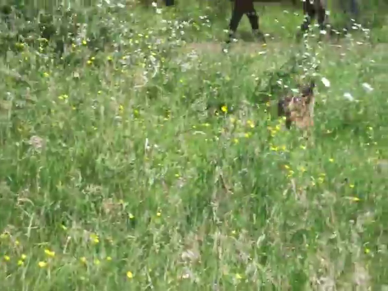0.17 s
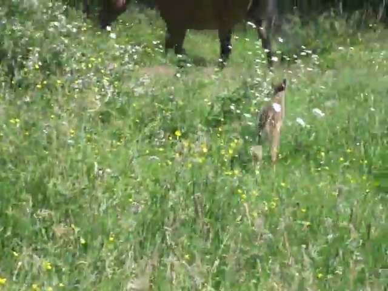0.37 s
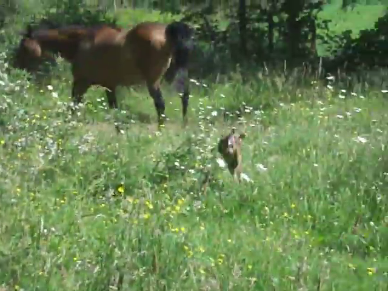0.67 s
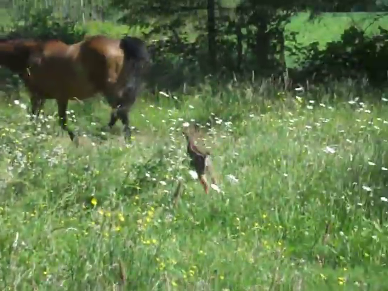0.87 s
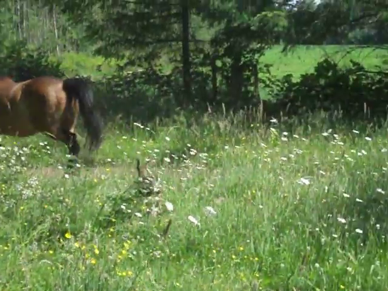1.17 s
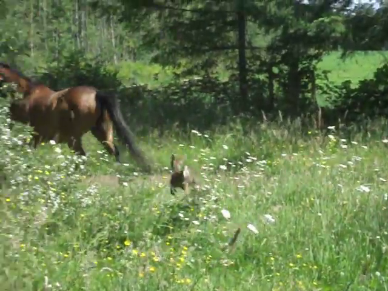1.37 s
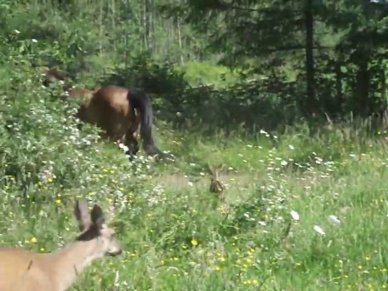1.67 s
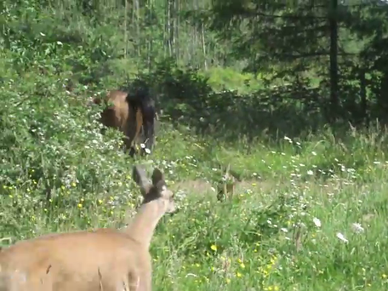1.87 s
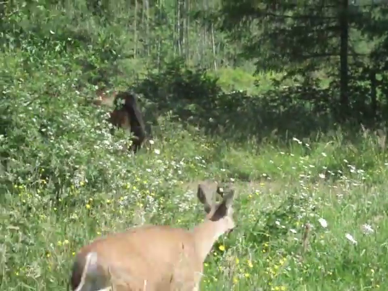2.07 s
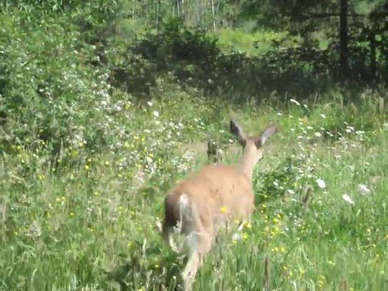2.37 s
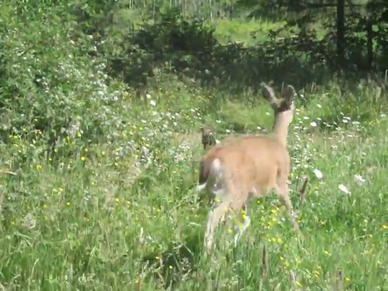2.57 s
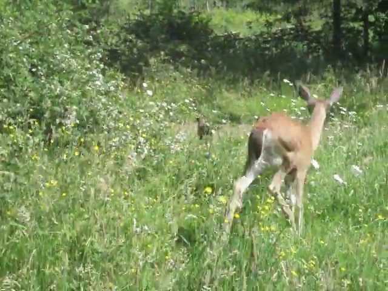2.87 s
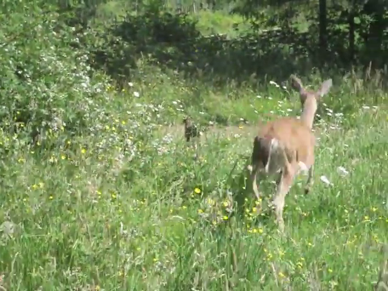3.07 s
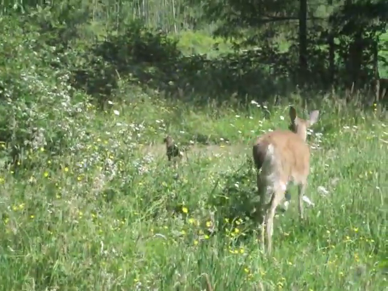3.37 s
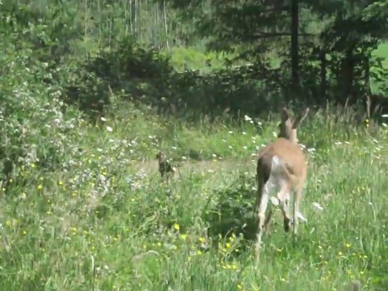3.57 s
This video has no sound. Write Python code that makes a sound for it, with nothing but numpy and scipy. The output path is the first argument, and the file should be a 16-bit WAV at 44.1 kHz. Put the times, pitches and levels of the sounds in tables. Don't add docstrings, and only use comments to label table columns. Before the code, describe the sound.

Loud, clipped plastic clicks from a camera control burst at about 0.44 and 0.52 seconds, very close and dry. A narrow, nasal leaf hiss runs throughout a summer meadow while low wind gusts thump the microphone, strongest near 0.3, 2.3 and 3.0. Grass ticks and swishes around 1.7 and 2.4-2.9. A distant bird chirps at 2.0 and 3.3, with faint low notes near 2.7; a twig cracks at 3.36.

```python
import sys
import numpy as np
from scipy import signal
from scipy.fft import rfft, irfft, next_fast_len
from scipy.io import wavfile
from scipy.ndimage import uniform_filter1d

SR = 44100
rng = np.random.default_rng(int(sys.argv[2]) if len(sys.argv) > 2 else 0)


def waveform_to_disk(signal):
    frames = np.transpose(np.atleast_2d(signal))
    scaled = np.clip(frames, -1, 1) * 32767
    samples = np.round(scaled).astype(np.int16)
    wavfile.write(sys.argv[1], SR, samples)


def convert_level_to_amplitude(level_db):
    exponent = np.asarray(level_db, float) / 20
    return 10 ** exponent


N = 163611
T = np.arange(N) / SR


def rms_one(x):
    return x / np.sqrt(np.mean(x ** 2) + 1e-20)


def band(x, low_hz, high_hz):
    return signal.sosfilt(signal.butter(2, [low_hz, high_hz], "band", fs=SR, output="sos"), x)


def drift(rate):
    pole = np.exp(-80 * np.pi * rate / SR)
    noise = rng.standard_normal(N // 40 + 2002)
    slow = signal.lfilter([1], [1, -2 * pole, pole * pole], noise)[2000:]
    return np.interp(np.arange(N) / 40, np.arange(len(slow)), rms_one(slow))


def ring(clicks, hz, t60):
    radius, angle = convert_level_to_amplitude(-60 / (t60 * SR)), 2 * np.pi * hz / SR
    return signal.lfilter([0, np.sin(angle)], [1, -2 * radius * np.cos(angle), radius * radius], clicks + 1e-18)


def port(x):
    # resonance in Hz, width in Hz, gain in dB.
    resonances = [(1350, 270, -12.5), (1850, 980, -18.5), (2400, 420, -10), (2817, 128, 4),
                  (3076, 250, -4.5), (3700, 1300, -26), (4800, 1000, -26.5)]
    direct_db, direct_corner_hz = -14.5, 699
    size = next_fast_len(N + 8192)
    hz = np.arange(size // 2 + 1) * SR / size + 1
    power = convert_level_to_amplitude(2 * direct_db) / (1 + (hz / direct_corner_hz) ** 4) / (1 + (100 / hz) ** 2)
    for top_hz, width_hz, db in resonances:
        power = power + convert_level_to_amplitude(2 * db) / (1 + ((hz - top_hz) / width_hz) ** 2) ** 2
    cepstrum = irfft(np.log(power + 1e-12) / 2, size)
    cepstrum[1:size // 2] *= 2
    cepstrum[size // 2 + 1:] = 0
    return irfft(rfft(x, size) * np.exp(rfft(cepstrum)), size)[:N]


def foliage():
    # time in seconds, level in dB.
    breeze = [(0.1, -34), (0.13, -33), (0.24, -33), (0.27, -33.5), (0.88, -33.5), (1.37, -34), (1.82, -33),
              (3.19, -34), (3.47, -32.5), (3.71, -33.5)]
    # centre in seconds, level over the hiss in dB, half width in seconds.
    swishes = [
        (1.705, 0.5, 0.0072),
        (2.46, 3, 0.023),
        (2.577, 4, 0.038),
        (2.659, 2, .03),
        (2.787, 2.5, 0.0078),
        (2.9, 2.5, 0.011),
        (3.364, 10, .003),
        (3.371, 4, .003),
        (3.52, -0.5, .02),
    ]
    hiss_db, patchy_db, rustles_per_s, rustle_db = 0.5, 1.1, 470, -10.5
    struck = rng.random(N) < rustles_per_s * convert_level_to_amplitude(3 * drift(25)) / SR
    strength = convert_level_to_amplitude(1.2 * np.minimum(rng.exponential(1, N), 4))
    grains = struck * strength * rng.choice([-1, 1], N)
    air = rng.standard_normal(N) + convert_level_to_amplitude(rustle_db) * rms_one(grains)
    swell_db = sum(db * np.exp(-((T - s) / width) ** 2) for s, db, width in swishes)
    flicker_db = patchy_db * drift(12)
    breeze_db = np.interp(T, *np.transpose(breeze))
    return port(air * convert_level_to_amplitude(swell_db + flicker_db + breeze_db)) * convert_level_to_amplitude(hiss_db) / np.std(port(air))


def bird():
    chirp_tops = [
        2.039,
        3.29,
        3.319,
        2.672,
        2.735,
    ]
    chirp_levels = [-17, -28, -16.5, -24, -28.5]
    # top pitch in Hz, rise in seconds, fall in seconds, foot pitch as a share of the top.
    chirp_shapes = [(2930, .051, .023, .42), (2880, .03, .012, .6), (2940, .055, .021, .42),
                    (1720, .025, .03, .75), (1780, .025, .015, .8)]
    rise_bend, fall_bend = 2.2, 2.8
    foot_lift_db, fall_lift_db, after_top_db, flutter_db = -2, 4, -4, 2.0
    dip_lead_s, dip_s = .006, .004
    near_echo_s, near_echo_db = .012, -7
    tree_echo_db, tree_t60_s = -6, .3
    song = np.zeros(N)
    for s, db, (top_hz, rise, fall, foot) in zip(chirp_tops, chirp_levels, chirp_shapes):
        rising = T < s
        inside = np.clip(np.where(rising, (s - T) / rise, (T - s) / fall), 0, 1)
        sag = inside ** np.where(rising, rise_bend, fall_bend)
        lift_db = np.where(rising, foot_lift_db, fall_lift_db) * np.sqrt(sag)
        dip_db = after_top_db * np.clip((T - s + dip_lead_s) / dip_s, 0, 1)
        level = convert_level_to_amplitude(db + lift_db + dip_db + flutter_db * drift(60))
        edges = np.clip(8 * (1 - inside), 0, 1)
        pitch_hz = top_hz * (1 - (1 - foot) * sag)
        song += level * edges * np.sin(2 * np.pi * np.cumsum(pitch_hz) / SR)
    lag = T[:SR // 2]
    trees = rng.standard_normal(len(lag)) * convert_level_to_amplitude(-60 * lag / tree_t60_s) * (lag > .015)
    ground = convert_level_to_amplitude(near_echo_db) * np.roll(song, int(near_echo_s * SR))
    scattered = signal.fftconvolve(song, trees / np.linalg.norm(trees))[:N]
    return port(song + ground + convert_level_to_amplitude(tree_echo_db) * scattered)


def grass():
    # start in seconds, level in dB, pitch in Hz, 60 dB decay time in seconds.
    stem_ticks = [(1.705, -28, 1520, 0.018), (1.71, -34.5, 2786, 0.06), (1.748, -21, 3020, 0.013),
                  (2.386, -32, 970, 0.032), (2.477, -27.5, 970, 0.013), (2.56, -31, 2255, 0.034),
                  (2.573, -19, 2997, 0.028), (2.59, -18, 2140, 0.01), (2.593, -29.5, 2975, 0.019),
                  (2.68, -35, 990, 0.034), (2.783, -22.5, 3260, 0.016), (2.79, -34, 1000, .05),
                  (2.898, -29, 1800, .02), (3.401, -39.5, 1345, 0.057), (3.51, -31, 800, 0.016),
                  (3.53, -34, 1016, 0.037), (3.634, -36, 980, 0.065), (.591, -30, 2570, .03),
                  (1.814, -31, 2780, 0.016), (2.959, -27, 3030, .03), (2.285, -27, 780, .02),
                  (.06, -37, 565, 0.15), (3.3609, -5, 2670, 0.0066), (3.365, -20, 2070, .015)]
    out, touch = np.zeros(N), np.hanning(90)
    for s, db, hz, t60 in stem_ticks:
        i = int(s * SR)
        rub = np.cos(2 * np.pi * hz * T[:90]) + .5 * rng.standard_normal(90)
        clicks = np.r_[touch * rub / 22, np.zeros(3000)]
        out[i:i + 3090] += convert_level_to_amplitude(db) * ring(clicks, hz, t60)[:N - i]
    return out


def wind():
    # centre in seconds, level in dB, half width in seconds, speed from 0 to 1.
    gusts = [(.08, -42, 0.043, .1), (.3, -11, 0.049, 0.65), (.67, -20.5, 0.07, 0.26),
             (.8, -29.5, 0.026, 0.87), (.95, -23, 0.068, 0.22), (1.15, -26, 0.21, 0.23),
             (1.5, -16, 0.045, 0.57), (1.63, -13, 0.019, 0.44), (1.75, -18.5, 0.062, 0.57),
             (1.9, -18, 0.051, 1), (1.99, -17, 0.02, 1), (2.1, -23.5, .04, .2), (2.23, -10, 0.01, 0.15),
             (2.28, -7.5, 0.016, 0.71), (2.46, -15, 0.024, 0.52), (2.545, -12.5, 0.015, 0.47),
             (2.65, -22, 0.019, 0.3), (2.8, -23, 0.048, 0.06), (2.97, -19, 0.089, 0.31),
             (3.03, -7.5, 0.013, 0.22), (3.2, -28, 0.12, 0.04), (3.38, -12.5, 0.03, 0.69),
             (3.49, -10, 0.049, 0.32), (3.63, -21, 0.033, 0.41), (3.7, -13.5, 0.011, 0.66)]
    # low edge in Hz, high edge in Hz, level at middle speed in dB, gain in dB per unit of speed.
    eddy_sizes = [(13.02, 36, -4.5, -10.5), (41.1, 85, -3, 7.5), (85.1, 156, -11.5, 17.5),
                  (148, 250, -24, 22), (244, 420, -36.5, 12)]
    calm_db, calm_speed = -30.5, 0.39
    evenness = .75
    flutter_per_s, flutter_db = 14, 1.5
    diaphragm_limit = .62
    power = np.full(N, convert_level_to_amplitude(2 * calm_db))
    weighted_speed = power * calm_speed
    for s, db, width, fast in gusts:
        bell = convert_level_to_amplitude(2 * db) * np.exp(-((T - s) / width) ** 2)
        power = power + bell
        weighted_speed = weighted_speed + bell * fast
    speed = weighted_speed / power
    pressure, flutter = 0, drift(flutter_per_s)
    for low_hz, high_hz, db, per_speed_db in eddy_sizes:
        noise = rng.standard_normal(N + SR)
        eddy = band(band(noise, low_hz, high_hz), low_hz, high_hz)[SR:]
        swell = np.sqrt(uniform_filter1d(eddy ** 2, int(SR / low_hz)) + 1e-20)
        level_db = db + per_speed_db * (speed - .5) + flutter_db * flutter * (low_hz > 30)
        pressure = pressure + convert_level_to_amplitude(level_db) * rms_one(eddy / swell ** evenness)
    return diaphragm_limit * np.tanh(1.07 * np.sqrt(power) * pressure / diaphragm_limit)


def snaps():
    snap_starts = [
        .4419,
        .4432,
        .4452,
        .4619,
        .5141,
        .5160,
        .5184,
        .5206,
    ]
    # level in dB, contact length in seconds, tilt in dB per octave.
    contacts = [(-1, 0.0018, -3.5), (3, 0.0014, 6), (-8.5, 0.0019, 0.5), (1, 0.00051, 4.5), (2, .0016, 5),
                (1, 0.0019, 0), (-1, 0.0018, 2.5), (-11.5, 0.0018, 4)]
    # mode in Hz, level in dB, 60 dB decay time in seconds.
    modes = [(800, -26, 0.0055), (1182, -17, 0.013), (1931, -12.5, 0.014), (2510, -8, 0.011),
             (2956, -6, 0.0071), (3433, -13.5, 0.002), (4900, -27.5, 0.0013)]
    spread_db = 1.5
    out, age = np.zeros(N), T[:3000]
    for s, (db, length, tilt_db) in zip(snap_starts, contacts):
        i = int(s * SR)
        contact = np.sin(np.pi * np.clip(age / length, 0, 1))
        for (hz, mode_db, t60), (turn, luck) in zip(modes, rng.standard_normal((len(modes), 2))):
            rung = ring(contact * np.cos(2 * np.pi * hz * age + 3 * turn), hz, t60)
            level_db = db + mode_db + tilt_db * np.log2(hz / 2700) + spread_db * luck
            out[i:i + 3000] += convert_level_to_amplitude(level_db) * rung / np.abs(rung).max()
    return out


def scene():
    return (foliage() + bird() + grass() + wind() + snaps())[None]


def band_limit(x):
    return signal.sosfilt(signal.butter(12, 16600, fs=SR, output="sos"), x)


def record(dry):
    cutoff_hz, roll_hz = 6390, 5540
    start_s, fade_s, fade_from_db = .03628, .048, -15
    offset, offset_start, settle_s = -.013, -.11, .15
    clip_level = .725
    x = signal.sosfilt(signal.cheby2(16, 70, cutoff_hz, fs=SR, output="sos"), dry)
    x = signal.sosfilt(signal.butter(3, roll_hz, fs=SR, output="sos"), x)
    age = T - start_s
    fade = convert_level_to_amplitude(fade_from_db * np.clip(1 - age / fade_s, 0, 1))
    bias = offset + (offset_start - offset) * np.exp(-(age / settle_s) ** 2)
    mix = np.clip(x * fade + bias, -clip_level, clip_level) * (age > 0)
    return band_limit(mix)


dry = scene()
out = record(dry)
waveform_to_disk(out)
```